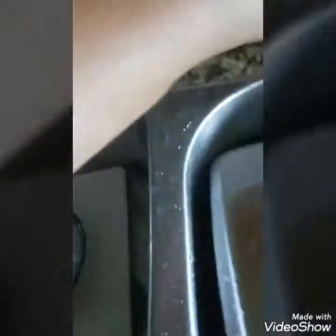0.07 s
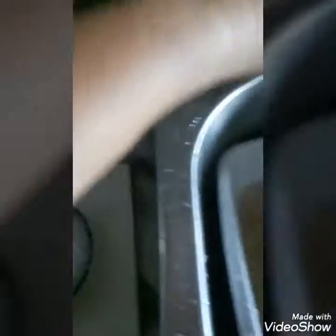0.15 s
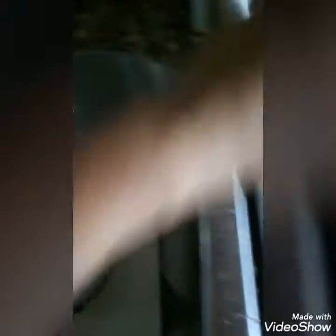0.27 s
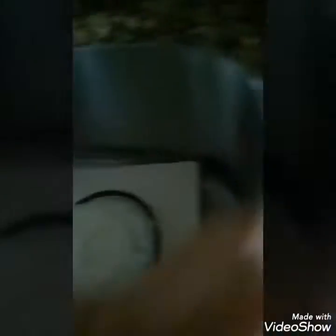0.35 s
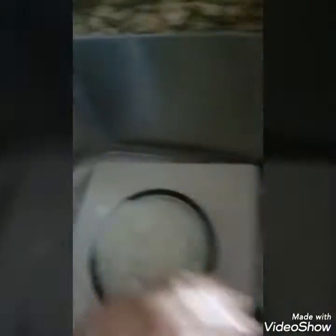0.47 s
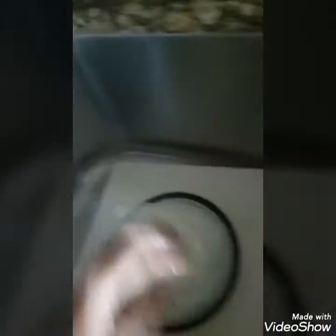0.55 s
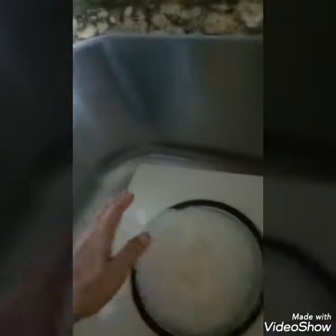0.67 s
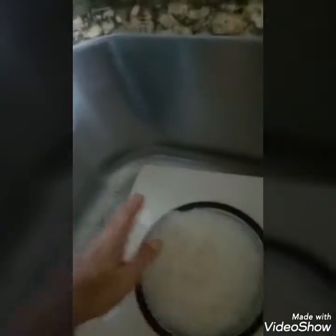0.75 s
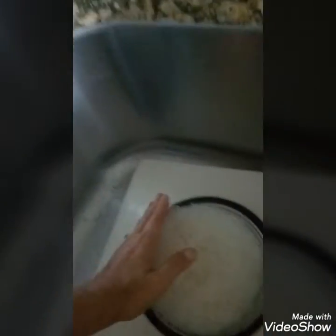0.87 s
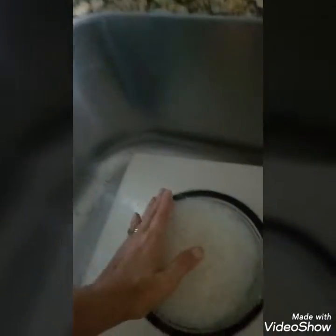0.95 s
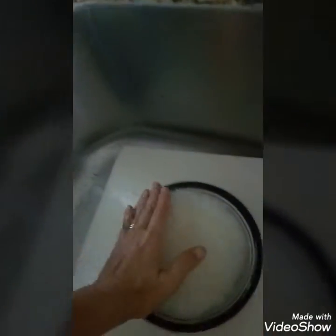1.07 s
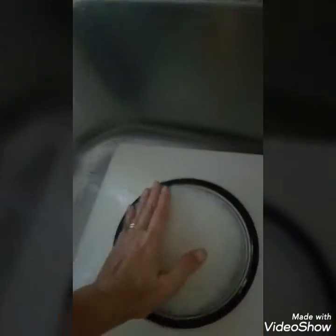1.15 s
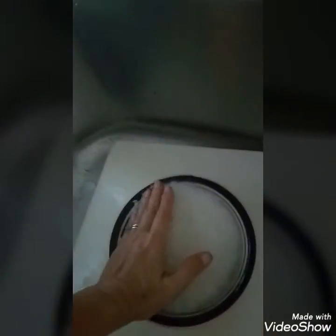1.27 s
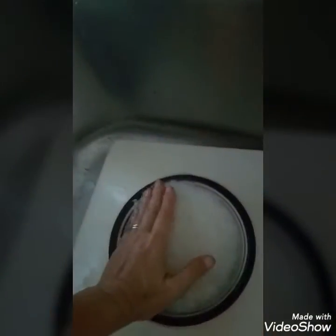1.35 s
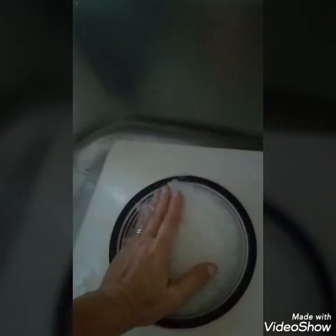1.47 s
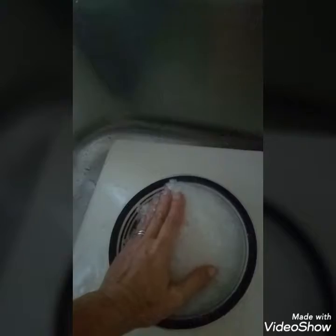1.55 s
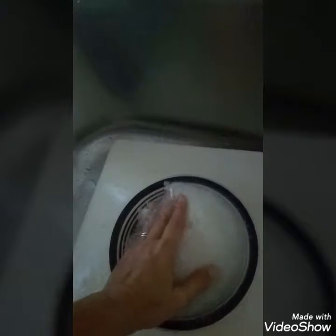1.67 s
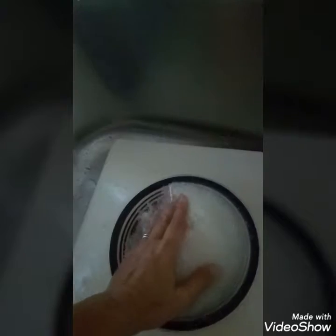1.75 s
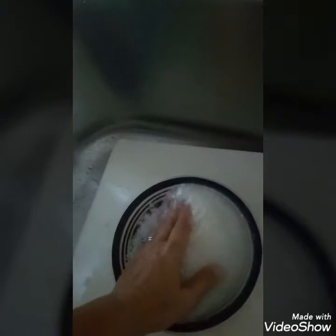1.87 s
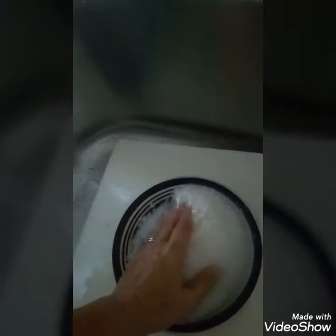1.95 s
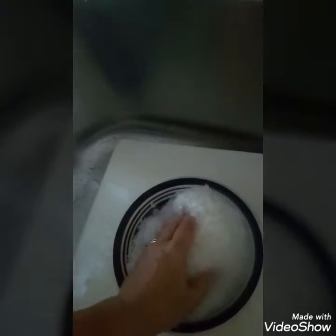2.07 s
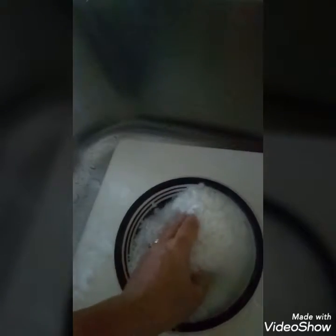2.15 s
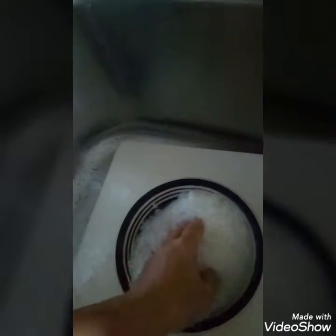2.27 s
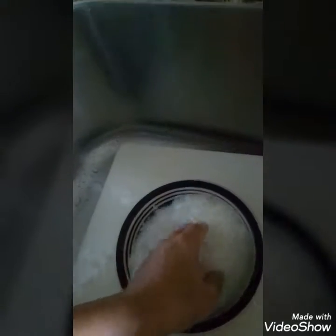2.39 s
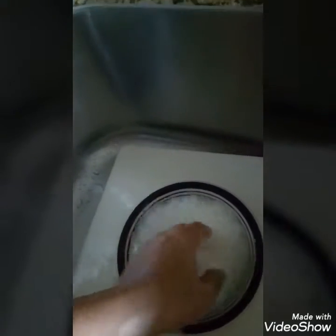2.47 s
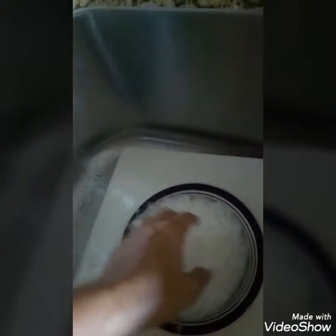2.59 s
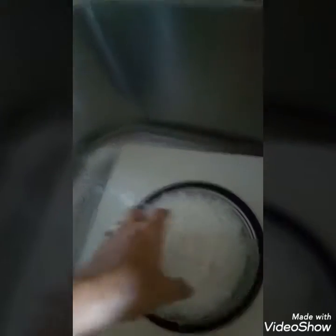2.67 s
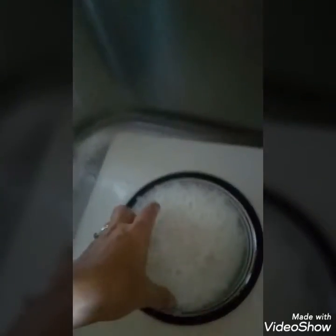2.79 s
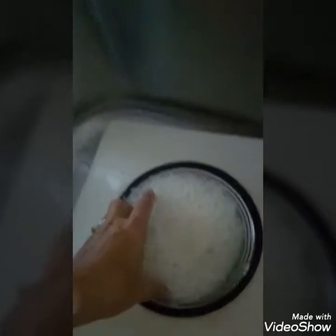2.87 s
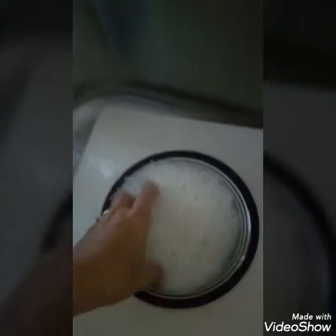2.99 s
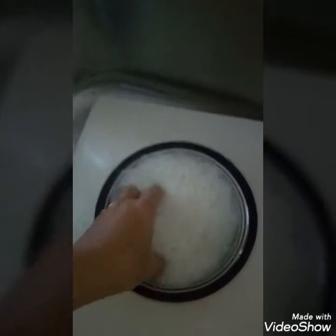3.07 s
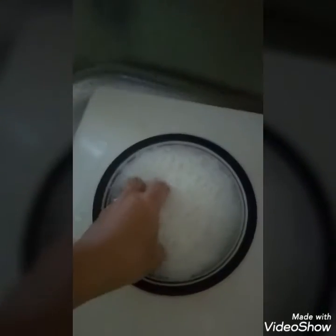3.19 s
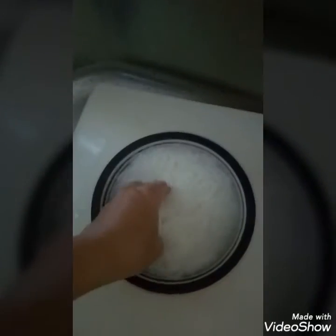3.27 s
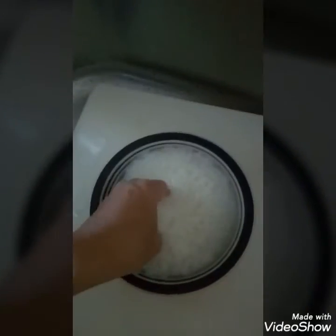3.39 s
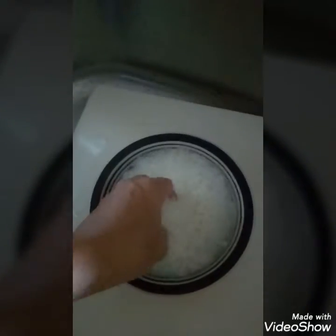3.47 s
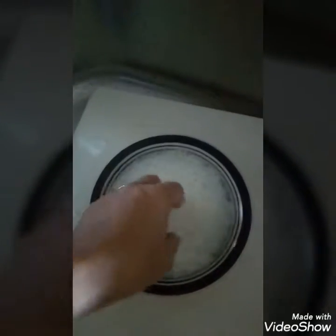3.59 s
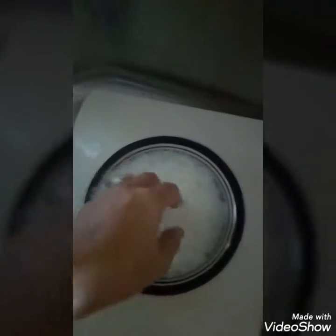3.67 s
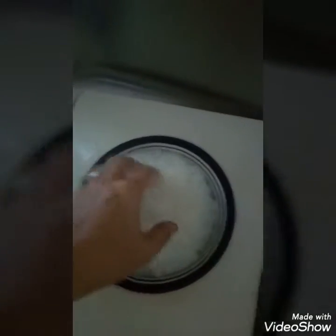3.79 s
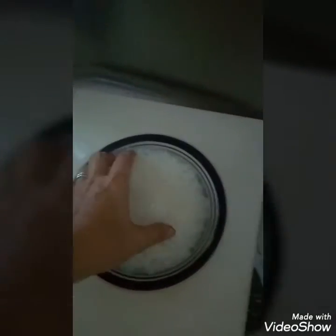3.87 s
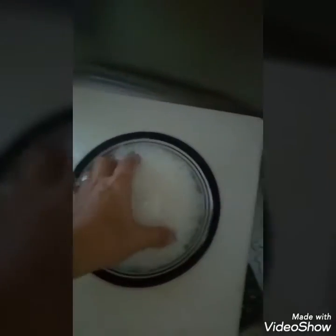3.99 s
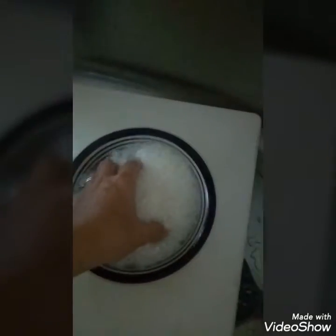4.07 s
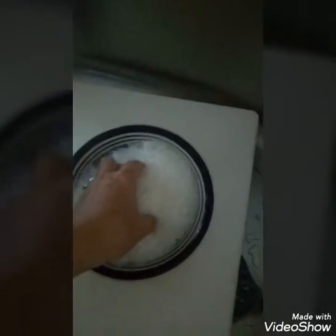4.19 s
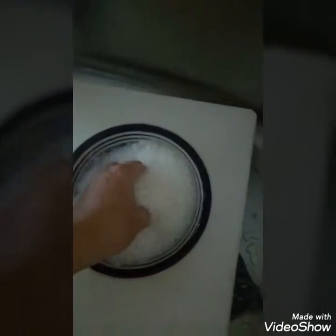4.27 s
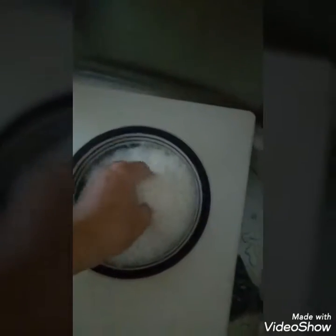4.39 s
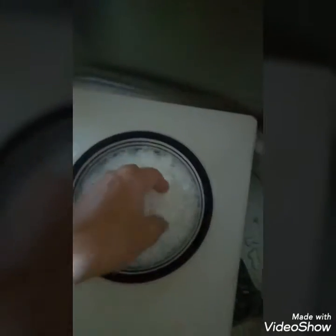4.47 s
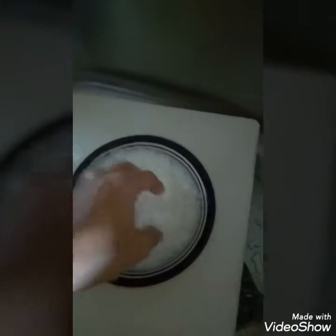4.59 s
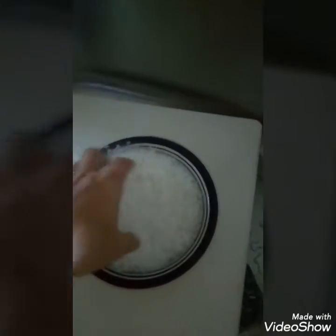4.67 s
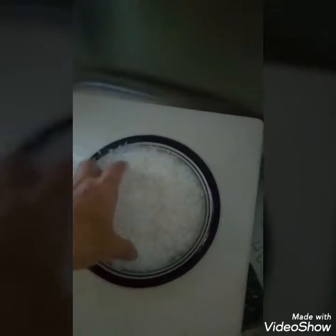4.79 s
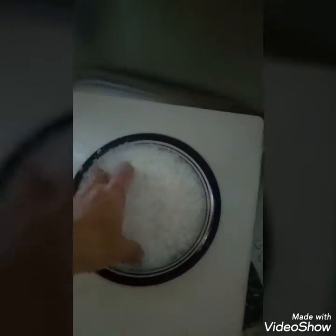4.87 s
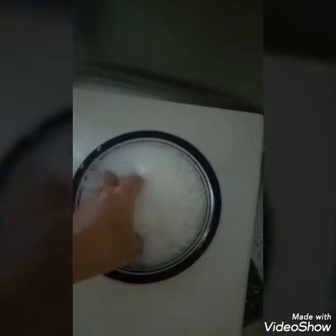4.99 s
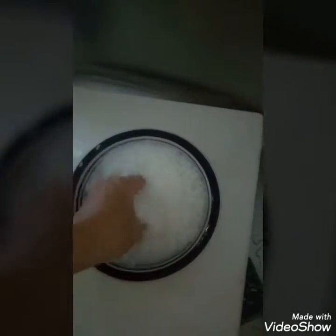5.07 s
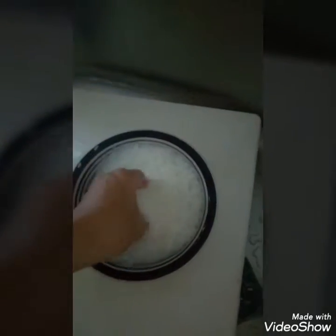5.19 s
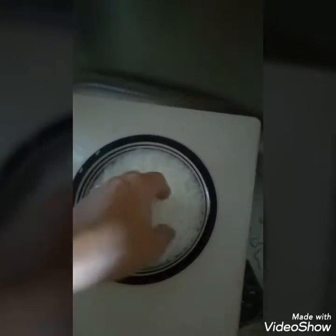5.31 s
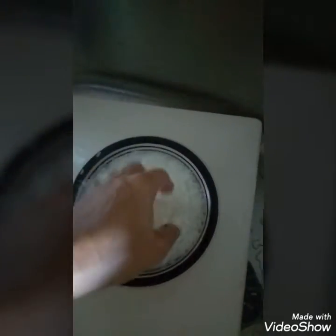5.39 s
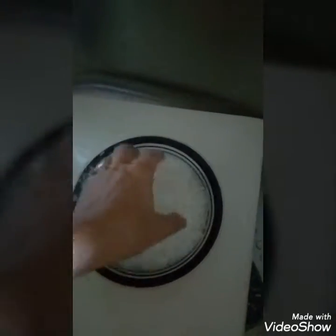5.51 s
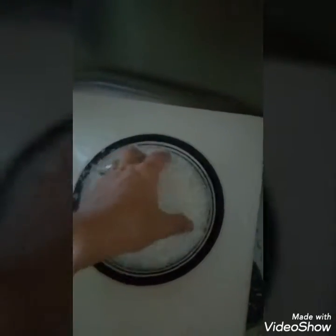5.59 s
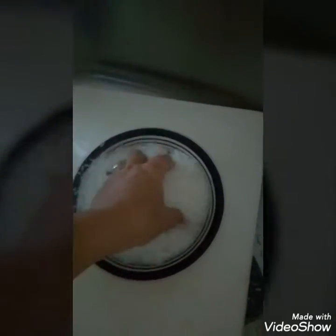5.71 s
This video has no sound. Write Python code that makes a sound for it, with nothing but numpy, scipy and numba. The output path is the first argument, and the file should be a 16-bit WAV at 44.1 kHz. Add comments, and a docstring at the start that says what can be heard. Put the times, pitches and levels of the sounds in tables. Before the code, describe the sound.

A full tap stream opens the sound, loud, bright and fizzy, sputtering into a bowl in a steel sink. At about 0.35 s it is shut off, falling sharply to a draining wash that is gone by 1.4 s. From 0.5 to 1.3 s, hollow low plops bubble in quick clusters, with tiny high ticks and spits of water. A low appliance hum is faintly present, dying down after 2 s. From 1.5 to 3 s, trickles, plops and grainy rustles of wet rice under a hand come in sweeps. Soft dull knocks on the steel fall near 2.3, 2.8, 3.3, 3.8 and 4.3 s. It thins around 3.1 to 3.7 s, then a flurry of gurgles returns from 3.8 to 4.6 s. A crisp drip clicks at 5 s; low rumble, faint drips and a small knock near 5.6 s end it. Close stereo, left-heavy, short kitchen reverberation.

```python
"""Rinsing rice at a steel sink

A kitchen tap is shut off; rinse water from a bowl of rice trickles, plops and ticks into a steel sink.
Bubbles are damped sines that excite the air modes of the basin; splashes and sprays are shaped noise.
Wet rice rustles under a hand in dense clicks, water spits in short bright noise bursts, the steel booms
and rings as band-passed noise and knocks, and an appliance hums in harmonics over the filtered noise
of the kitchen, all heard at two close ports.
"""
import sys
import numpy as np
from scipy import signal
from scipy.fft import rfft, irfft
from scipy.io import wavfile
from scipy.ndimage import uniform_filter1d
from numba import njit

SR = 44100
rng = np.random.default_rng(int(sys.argv[2]) if len(sys.argv) > 2 else 0)


def to_wav(sig):
    """Store sig (one row per channel, or 1-D mono) as 16-bit WAV at the path in sys.argv[1].

    Samples outside -1..1 are clipped; the rate is SR.
    """
    pcm = np.clip(np.atleast_2d(sig), -1, 1) * 32767
    pcm = np.round(pcm).astype(np.int16)
    wavfile.write(sys.argv[1], SR, pcm.T)  # frames by channels


N = 253134
T = np.arange(N) / SR  # s
HZ = np.maximum(np.fft.rfftfreq(N, 1 / SR), 1)

# Spectrum of the tap stream: frequency_hz [Hz], density_db [dB per Hz, relative]
JET_SPECTRUM = [(120, -64), (200, -6), (333, -10), (446, -4), (564, -18), (890, -14), (1150, -19),
                (1260, -9), (1400, -24), (1540, -10.5), (2000, -11.5), (2700, -9.5), (3200, -4.5),
                (3890, -1.5), (6830, -6), (7600, -16), (11000, -20), (15500, -39)]
# Drumming of the stream in the bowl, before the drain fade: time_s [s], level_db [dB]
DRUM_LEVEL = [(0, -59), (.18, -34.5), (.38, -41), (.44, -54), (.47, -38), (.6, -48.5), (.77, -52),
              (.82, -38), (.87, -42)]
JET_DB, WASH_DB = -24.5, -39  # full stream and draining wash, before the drain fade
SHUT_S, SHUT_LEN_S, DRAIN_END_S = 0.35, 0.08, 1.41


def jet():
    """Jet noise: dense bubbles over hiss, with bowl drumming; after shut-off the smoother wash drains."""
    fizz = [swarm(3000, 1300, 7200, 11.0, 3.8, .01) + .6 * rng.standard_normal(N) for _ in range(2)]
    spectra = [rfft(f) for f in fizz]
    # divide out the broad spectrum so that the table alone sets the colour
    flat = [f / np.sqrt(uniform_filter1d(np.abs(f) ** 2, size=2000)) for f in spectra]
    stream = ports(*(np.array(flat) * undb(over_hz(JET_SPECTRUM))))
    treble = irfft(rfft(stream) / (1 + (7000 / HZ) ** 8), N)
    calming = np.interp(T, [SHUT_S, SHUT_S + 3 * SHUT_LEN_S], [1, .4])
    sputter_db = (1.8 * walk(201.5) + 1.42 * walk(45)) * calming
    # the treble sputters half as deeply
    stream = unit((stream - treble) * undb(sputter_db) + treble * undb(sputter_db / 2))
    drum_db = over_time(DRUM_LEVEL, count=1) + 2.5 * walk(22.8)
    drum = hiss(resonance(473, 90)) * undb(drum_db)
    shut_times = [SHUT_S, SHUT_S + SHUT_LEN_S, SHUT_S + 3 * SHUT_LEN_S]
    flow_db = np.interp(T, shut_times, [JET_DB, WASH_DB + 11.0, WASH_DB])
    drain = np.clip((DRAIN_END_S - T) / 1.09, 0, 1)
    return (stream * undb(flow_db) + drum) * drain


@njit
def bubbles(length, start, hz, cycles, size, glide, rise):
    """Bubble oscillation: decaying sines swell over rise cycles; pitch climbs for two decay times."""
    out = np.zeros(length)
    for k in range(len(start)):
        span = cycles[k] * SR / hz[k]  # decay time in samples
        phase = 0.
        for i in range(min(int(5 * span), length - start[k])):
            phase += 2 * np.pi * hz[k] * (1 + glide * min(i / span, 2.)) / SR
            swell = min(phase / (2 * np.pi * rise), 1.) ** 2
            out[start[k] + i] += size[k] * swell * np.exp(-i / span) * np.sin(phase)
    return out


def swarm(per_s, low_hz, high_hz, cycles, scatter_db, glide):
    """Random superposition: bubbles at chance times, many small and few large, scaled to rms 1."""
    when, pitch, chance = rng.random((int(per_s * N / SR), 3)).T
    size = undb(np.minimum(-scatter_db * np.log(1 - chance), 4 * scatter_db))
    hz = low_hz * (high_hz / low_hz) ** pitch
    return unit(bubbles(N, (when * N).astype(np.int64), hz, cycles + 0 * hz, size, glide, 1.27))


LEAN_SPREAD_DB = 4.5  # largest random lean to either side


def bubble_broods(table, cycles, lean_db, glide, brood_db, spread_s, reach):
    """Bubble clusters: each listed bubble and four smaller ones near its pitch lean left or right."""
    s, db, hz = table[:, 0], table[:, 1], table[:, 2]
    when, pitch, weaker, side_draw = rng.random((len(s), 4, 5)).transpose(1, 0, 2)
    when[:, 0], pitch[:, 0] = 0, .5  # the first of each brood is the listed bubble
    lean = lean_db + LEAN_SPREAD_DB * (2 * side_draw[:, 0] - 1)
    start = ((s[:, None] + spread_s * when) * SR).astype(np.int64).ravel()
    brood_hz = (hz[:, None] * reach ** (2 * pitch - 1)).ravel()
    size_db = db[:, None] + (brood_db - 10.0 * weaker) * (np.arange(5) > 0)
    life = np.repeat(cycles + 0 * s, 5)
    sides = []
    for side in (1, -1):
        size = undb(size_db + side * lean[:, None] / 2).ravel()
        sides.append(bubbles(N, start, brood_hz, life, size, glide, 0.94))
    return np.array(sides)


# Large bubbles, before the basin: start_s [s], level_db [dB], pitch_hz [Hz], decay_cycles [cycles]
PLOP_EVENTS = [(.54, -28, 890, 4.5), (.572, -26, 865, 3.8), (.664, -8, 880, 2.2), (0.707, -13, 815, 1.4),
               (.727, -11.5, 840, 2.2), (.76, -13.5, 805, 2.3), (.793, -16, 927, 3), (.81, -5.5, 815, 1.8),
               (.88, -23.5, 1270, 3.4), (0.95, -16, 800, 1.56), (.999, -23.5, 564, 13),
               (1.003, -28.5, 1700, 14), (0.896, -25.5, 1466, 4.6), (1.043, -31, 1480, 3.2),
               (1.15, -12, 910, 0.94), (1.168, -16, 875, 2.3), (1.205, -12.5, 810, 2.4),
               (1.228, -10.5, 810, 1.16), (1.272, -20.5, 2280, 11.5), (1.459, -6, 1200, 0.5),
               (1.508, -18.5, 935, 1.8), (1.544, -19, 940, 4.6), (1.572, -32, 1180, 2.7),
               (1.623, -20, 1350, 3.9), (1.65, -31.5, 1500, 7.9), (1.675, -28.5, 1320, 4.8),
               (1.724, -32, 1530, 13), (1.752, -30, 1430, 8.6), (1.772, -16, 1438, 7.1),
               (1.871, -14, 1070, 1.8), (1.898, -11.5, 940, 1.2), (1.916, -10.5, 893, 2.8),
               (1.962, -24.5, 1385, 12.3), (2.048, -35.5, 1440, 14), (2.109, -24.5, 1554, 7.5),
               (2.168, -18.5, 930, 1.5), (2.196, -17.5, 1340, 1.5), (2.206, -12.5, 2080, 3.3),
               (2.218, -15.5, 564, 1.3), (2.281, -27, 1550, 4.5), (2.422, -27, 1730, 10.4),
               (2.491, -20.5, 1860, 8.4), (2.551, -34.5, 1510, 7.6), (2.651, -12, 1340, 0.62),
               (2.801, -24, 1927, 22), (2.895, -12, 850, 0.71), (2.941, -30.5, 1590, 7.8),
               (2.977, -7.5, 1680, 0.94), (3.042, -25, 1210, 1.5), (3.184, -48, 1075, 45),
               (3.216, -49, 1092, 26), (3.272, -30.5, 844, 2), (3.431, -42.5, 1474, 16),
               (3.481, -37.5, 1477, 6.3), (3.601, -36.5, 1340, 3.1), (3.775, -15, 940, 1.6),
               (3.798, -14.5, 1160, 2.3), (3.864, -20, 1180, 1.25), (4.003, -19.5, 1378, 7.9),
               (4.029, -27.5, 1350, 4.8), (4.06, -25, 1940, 10), (4.077, -19, 890, 2.2),
               (4.141, -19.5, 835, 1.2), (4.275, -31, 860, 2.2), (4.353, -25.5, 1495, 3.3),
               (4.408, -20.5, 920, 7.5), (4.409, -20.5, 1254, 4.1), (4.38, -37, 1400, 3),
               (4.434, -16, 910, 2.7), (4.435, -17.5, 1280, 1.4), (4.479, -16.5, 1387, 8.4),
               (4.53, -4, 1240, 0.62), (4.62, -32.5, 1210, 4), (4.79, -56, 1270, 2.5),
               (4.82, -53, 1260, 4.9), (5.36, -66, 1334, 9.9), (5.385, -58, 1350, 12),
               (5.402, -52.5, 1352, 12), (5.707, -51.5, 1360, 2.1)]
PLOP_LEAN_DB = 0.5  # left minus right, beyond the usual balance


def plops(table):
    """Large-bubble resonance: low tones of steady pitch, most quickly damped and some ringing long."""
    return bubble_broods(table, table[:, 3], PLOP_LEAN_DB, 0., -8.0, 0.009, 1.4)


SPLASH_DB, SPLASH_PER_PLOP = -35.5, 0.82  # drive for a -25 dB plop; dB per dB of plop


def splash(table):
    """Turbulent noise: a broad wet burst with each plop, stronger for a stronger plop."""
    band = resonance(1100, 1800) * resonance(970, 5800) ** 2
    wet = unit(irfft(rfft(rng.standard_normal(N)) * band, N))
    return bursts(table[:, 0], SPLASH_DB + SPLASH_PER_PLOP * (table[:, 1] + 25), 0.0032, 0.0021) * wet


# Small bubbles, before the basin:
# start_s [s], level_db [dB], pitch_hz [Hz], spray_db [dB relative to level_db]
TICK_EVENTS = [(.026, -12.5, 4070, -29), (.048, -19, 5630, -9), (.088, -24.5, 3830, -30.5),
               (.128, -16.5, 3920, -6.5), (.225, -16.5, 5200, -31), (.283, -10.5, 3540, -14),
               (.375, -12.5, 3380, -29.5), (.388, -9, 4000, -31), (0.4864, -25, 4990, 3),
               (0.5437, -22.5, 3920, -9), (0.616, -28.5, 2770, -35), (0.647, -28, 3510, -33),
               (0.665, -28.5, 2680, -40), (0.711, -37, 2750, -40), (.746, -27, 2740, -40),
               (0.7902, -21, 2690, -36), (0.808, -37, 2730, -40), (0.838, -38, 2700, -40),
               (0.878, -43, 2780, -40), (0.897, -35, 2710, -40), (.952, -31, 2740, -38),
               (1, -46, 2730, -40), (0.958, -23.5, 4580, -40), (1.022, -27.5, 3980, -42.5),
               (1.1497, -27.5, 3030, -42), (1.237, -36, 4260, -2), (1.21, -37, 2770, -38),
               (1.3, -36, 2730, -40), (1.353, -39, 4570, -40.5), (1.39, -38, 2800, -40),
               (1.409, -31, 4100, -21), (1.538, -26.5, 6740, -10), (1.559, -34, 3700, -27),
               (1.653, -34, 3780, -13), (1.744, -22, 3310, -18.5), (1.8652, -28.5, 3653, -22),
               (1.956, -31.5, 2710, -9.5), (1.989, -30, 4180, -35), (2.0728, -28.5, 4060, -13),
               (2.148, -31, 2740, -21), (2.173, -19.5, 3280, -37), (2.2065, -15.5, 3040, -22),
               (2.258, -17.5, 4750, -15), (2.02, -38, 2730, -40), (2.066, -33, 2970, -30),
               (2.287, -30, 5300, -25), (2.333, -34, 3970, -41), (2.446, -37, 2710, -38),
               (2.469, -32, 4740, -30), (2.51, -30.5, 3240, -15), (2.563, -33, 2840, -40),
               (2.62, -22.5, 2624, -39), (2.699, -29.5, 2250, -45), (2.775, -33.5, 2930, -21),
               (2.879, -34.5, 4030, -30), (2.978, -29, 4190, -11), (3.021, -32, 4410, -5.5),
               (3.172, -34.5, 3830, -35), (3.2093, -33.5, 2630, -10), (3.329, -35, 2690, -40),
               (3.37, -25, 4020, -55), (3.4182, -28.5, 2590, -12), (3.449, -44, 2700, -40),
               (3.4733, -38, 3710, -20), (3.5694, -32, 3780, -65), (3.605, -36, 3050, -34),
               (3.668, -33, 3960, -36), (3.7367, -27.5, 2940, -44), (3.776, -30, 2810, -43),
               (3.8005, -27, 2920, -56), (3.937, -36, 3830, -13), (3.97, -27, 3710, -27),
               (4.006, -30.5, 2730, -14), (4.074, -33.5, 4110, -27), (4.1428, -31.5, 3740, -17),
               (4.2514, -31, 3460, -31), (4.3357, -34, 4470, -10), (4.3504, -31, 3620, -41),
               (4.434, -39, 3470, -30), (4.48, -28.5, 4100, -12), (4.498, -43, 2730, -44),
               (4.535, -35, 2670, -42), (4.568, -35.5, 2830, -44), (4.61, -43, 2780, -35),
               (4.642, -36, 3290, -40), (4.689, -45, 2790, -42.5), (4.73, -48, 2750, -33),
               (4.956, -30.5, 5730, -12.5), (4.992, -24.5, 2780, -6.5), (4.9994, -16, 4490, -34),
               (5.31, -41.5, 5870, -27), (5.405, -47.5, 3600, -40), (5.525, -55, 2640, -33)]
TICK_LEAN_DB = -3  # left minus right, beyond the usual balance


def ticks(table):
    """Small-bubble resonance: high tones that climb slightly in pitch as they decay."""
    return bubble_broods(table, 13.1, TICK_LEAN_DB, 0.041, -6.0, 0.0086, 1.2)


def crack(table):
    """Impulsive noise: a rough broad snap of water with each tick."""
    wet = unit(irfft(rfft(rng.standard_normal(N)) * resonance(3560, 2600) ** 2, N))
    return bursts(table[:, 0], table[:, 1] - 8.0, 0.0055, 0.0029) * wet


def spray(table):
    """Droplet noise: a high-band burst of fine droplets with each tick, heard outside the basin modes."""
    fine = hiss(resonance(5450, 3900) ** 3 / (1 + (HZ / 10000) ** 6)) * undb(2.0 * walk(150))
    return bursts(table[:, 0], table[:, 1] + table[:, 3], 0.0047, 0.0045) * fine


# Water leaving the bowl and hand stirring the rice, before the basin:
# time_s [s], flow_gurgle_db [dB], stirring_fizz_db [dB]
TRICKLE_LEVEL = [(.4, -27, -46), (.5, -44.5, -35), (.95, -50, -45), (1.57, -37.5, -47.5),
                 (1.78, -44.5, -49), (1.96, -51.5, -76), (2.14, -48.5, -40.5), (2.21, -41, -44),
                 (2.3, -48.5, -46), (2.55, -55, -51), (2.81, -59, -53), (3.02, -52, -59.5), (3.3, -73, -49),
                 (3.6, -61, -67), (3.85, -63.5, -52), (4.05, -43.5, -50.5), (4.3, -62, -57),
                 (4.4, -48, -68), (4.5, -35.5, -44.5), (4.65, -58.5, -64.5), (5.2, -84.5, -64),
                 (5.74, -71, -80.5)]


def trickle():
    """Flow noise: bubble swarms over a running film, a low gurgle and a high fizz in flurries."""
    film = rfft(rng.standard_normal(N))
    low_film = unit(irfft(film * resonance(1700, 1600) ** 2, N))
    high_film = unit(irfft(film * resonance(4130, 4000) ** 2, N))
    gurgle = swarm(800, 500, 2600, 4.5, 3.9, 0.) + 0.15 * low_film
    fizz = swarm(1400, 1900, 5200, 9.0, 4.2, 0.) + 0.25 * high_film
    flow_db, stir_db = over_time(TRICKLE_LEVEL, count=1), over_time(TRICKLE_LEVEL, count=2)
    low = gurgle * undb(flow_db + 0.53 * walk(5.8))
    high = fizz * undb(stir_db + 2.0 * walk(45))
    # drops off the rim share nearly one pitch
    rim = swarm(71, 2613, 2830, 42.0, 7.7, 0.) * undb(-18.5 + (flow_db + stir_db) / 2)
    return (low + high + rim) * np.clip((T - .3) / 0.5, 0, 1)


# Air modes of the basin: frequency_hz [Hz], width_hz [Hz], gain_db [dB]
BASIN_MODES = [(466, 29, 0), (858, 45, -4.5), (1299, 75, 2), (1492, 83, -2), (2696, 58, 2.5), (3646, 72, 1),
               (3878, 88, 5.5), (4420, 380, -0.5), (6220, 320, 5)]
DIRECT_DB, WET_TOP_HZ = -14.5, 7500  # direct path; the basin dulls the water above this
KITCHEN_DB, KITCHEN_T60_S = -10, 0.27


def basin(source):
    """Cavity resonance: direct sound, air modes and a tail; modes differ in phase between the ports."""
    paths = []
    for port in range(2):
        modes = 0
        for k, (hz, width_hz, db) in enumerate(BASIN_MODES):
            # the phase turn at the second port grows with frequency, up to a limit
            turn = np.exp(1j * port * (-1) ** k * min(hz / 900, 2.2))
            modes = modes + undb(db) * resonance(hz, width_hz) * turn
        paths.append((undb(DIRECT_DB) + modes) * (1 + undb(KITCHEN_DB) * kitchen_tail()))
    lead = undb(over_hz(LEFT_LEAD_DB) / 2)
    dulling = 1 + (HZ / WET_TOP_HZ) ** 4
    return irfft(np.array([paths[0] * lead, paths[1] / lead]) * rfft(source) / dulling, N)


def kitchen_tail():
    """Reverberation: spectrum of exponentially decaying noise of unit energy after a 12 ms gap."""
    tail = rng.standard_normal(N) * np.exp(-np.log(1000) * T / KITCHEN_T60_S) * (T > .012)
    return rfft(tail / np.sqrt(np.sum(tail ** 2)))


# Rustle of rice, swelling with each sweep of the hand: time_s [s], level_db [dB]
RUSTLE_LEVEL = [(.5, -79), (1.5, -52), (1.9, -57), (2.05, -56), (2.2, -50.5), (2.3, -55.5), (2.5, -58.5),
                (2.85, -68.5), (3.0, -51.5), (3.15, -59.5), (3.4, -65.5), (3.65, -68.5), (3.8, -78),
                (4.05, -52), (4.2, -68.5), (4.33, -62), (4.4, -70), (4.5, -70), (4.65, -106), (5.0, -66.5),
                (5.74, -78.5)]


def rice():
    """Granular friction: wet grains rub under the hand, dense tiny clicks blending into rustles."""
    band = resonance(3870, 5440) ** 2
    a, b = (rfft(swarm(3000, 3000, 12000, 8.2, 3.7, 0.)) * band for _ in range(2))
    return unit(ports(a, b)) * undb(over_time(RUSTLE_LEVEL, count=1) + 2.5 * walk(30)) * (T > .45)


# Short bright spurts and spits of water, before envelope and left-right gain:
# start_s [s], level_db [dB], centre_hz [Hz]
SPURT_EVENTS = [(0.4084, -28, 7900), (0.4276, -26, 7650), (0.497, -29.5, 8160), (.6115, -45, 6300),
                (0.694, -44, 6750), (.8399, -47.5, 6000), (1.2071, -59, 6670), (1.3283, -45, 6500),
                (1.539, -38, 9600), (1.709, -48, 6500), (1.9459, -68, 7400), (2.0573, -49, 10700),
                (2.0994, -37.5, 5950), (2.1649, -51.5, 10800), (2.26, -39, 6500), (2.379, -47, 7000),
                (2.4206, -45.5, 5970), (2.489, -42, 5440), (2.878, -41.5, 6800), (2.954, -44, 6500),
                (3.0799, -56, 7340), (3.3044, -47.5, 6050), (3.417, -58, 6240), (3.5443, -53, 7100),
                (3.753, -49.5, 6450), (3.865, -51.5, 6100), (3.9707, -45.5, 7350), (4.0172, -38.5, 6400),
                (4.0616, -45, 10600), (4.11, -44, 6400), (4.338, -50, 6800), (4.4807, -56, 10300),
                (4.686, -60, 6440), (4.9986, -42, 9400), (4.999, -50, 13100), (5.3682, -56, 6860),
                (5.723, -67, 8000)]
SPURT_WIDTH, SPURT_RISE_S, SPURT_FADE_S = 0.28, 0.0017, 0.0052  # width as a share of the centre


def spurts():
    """Band-limited noise: short bright spurts and spits of water, each in its own high band."""
    out, t = np.zeros((2, N)), np.arange(2048) / SR
    shape = (1 - np.exp(-t / SPURT_RISE_S)) * np.exp(-t / SPURT_FADE_S)
    hz = np.maximum(np.fft.rfftfreq(len(t), 1 / SR), 1)
    for s, db, centre in SPURT_EVENTS:
        band = 1 / (1 + ((hz ** 2 - centre ** 2) / (hz * centre * SPURT_WIDTH)) ** 4)
        spit = unit(irfft(rfft(rng.standard_normal((2, len(t)))) * band)) * shape * undb(db)
        start = int(s * SR)
        out[:, start:start + len(t)] += spit[:, :N - start]
    return out * undb(np.array([[6.0], [-4.5]]))


# Boom of the steel floor: time_s [s], level_db [dB]
BOOM_LEVEL = [(1.6, -45), (2.4, -45.5), (3.13, -44.5), (3.55, -48), (3.61, -57), (3.8, -44.5),
              (4.63, -44.5), (5.3, -48.5), (5.44, -60.5), (5.54, -45), (5.67, -49)]
BOOM_HZ, BOOM_WIDTH_HZ = 134, 35
PATTER_DB, PATTER_PER_FLOW = -54.5, 0.37  # level at a flow of -43.5 dB; dB per dB of flow


def steel():
    """Plate vibration: the sink floor booms in one wide mode and patters under the trickle."""
    boom_db = over_time(BOOM_LEVEL, count=1) + 0.28 * walk(24)
    boom = hiss(resonance(BOOM_HZ, BOOM_WIDTH_HZ) ** 2) * undb(boom_db)
    flow_db = over_time(TRICKLE_LEVEL, count=1)
    patter_db = PATTER_DB + PATTER_PER_FLOW * (flow_db + 43.5) + 5.03 * walk(25.42)
    patter = hiss(resonance(344, 218) ** 2 + 0.58 * resonance(433, 60)) * undb(patter_db)
    return boom + patter * (T > .4)


# Modes of the steel, one floor, one rim, three middle, then top:
# frequency_hz [Hz], width_hz [Hz], gain_db [dB]
STEEL_MODES = [(177.6, 12.6, 9), (832, 48, 3), (2010, 55, -3), (2092, 50, 2), (2280, 100, -6),
               (2770, 60, 2), (2960, 80, -1), (3740, 100, -12)]
# Dull knocks on the steel floor, before drive and modes:
# start_s [s], level_db [dB], rim_db, middle_db, top_db [dB relative to level_db]
KNOCK_EVENTS = [(2.326, -28.5, -13.5, -9.5, -11.5), (2.801, -32, -26.5, -14, -13),
                (3.268, -42, -3, -4, -20), (3.773, -32.5, -10, -7.5, -7.5), (4.271, -39.5, -8.5, -20, -8.5),
                (4.887, -39.5, -6, -13, -32), (5.605, -43.5, -9.5, 14, 8.5), (5.704, -63, -12, 11, 4.5)]
PUSH_DB, RIM_DB, CONTACT_DB = 29, 56.5, 43.5  # drive of floor, rim and higher modes
SCRAPE_DB, SCRAPE_RISE_S, SCRAPE_FADE_S = -27, 0.002, 0.012  # rough contact around the click


def knocks():
    """Modal excitation: a soft push moves the floor; rim and high modes swell in through the water."""
    s, db, rim_db, middle_db, top_db = np.transpose(KNOCK_EVENTS)
    ring = [undb(gain_db) * resonance(hz, width_hz) for hz, width_hz, gain_db in STEEL_MODES]
    floor = rfft(bursts(s, db + PUSH_DB, 0.00085, 0.0002)) * ring[0]
    drives = []
    for extra in (rim_db + RIM_DB, middle_db + CONTACT_DB, top_db + CONTACT_DB):
        click = bursts(s + 0.000963, db + extra - 6.0, .00004, .00004)
        scrape = bursts(s + 0.00056, db + extra + SCRAPE_DB, SCRAPE_RISE_S, SCRAPE_FADE_S)
        drives.append(rfft(click + scrape * rng.standard_normal(N)))
    rim = drives[0] * ring[1] * resonance(838, 200) ** 2
    # extra resonance slows the onset of the higher modes
    steep = [r * resonance(hz, 290) ** 2 for r, (hz, _, _) in zip(ring, STEEL_MODES)]
    knock = floor + rim + drives[1] * sum(steep[2:5]) + drives[2] * sum(steep[5:])
    tails = np.array([kitchen_tail(), kitchen_tail()])
    knock = knock * (1 + undb(KITCHEN_DB) * tails)
    return irfft(knock * undb(np.array([[2.5], [-4.0]])), N)


# Harmonics of the motor, relative to the hum level: frequency_hz [Hz], level_db [dB]
HUM_HARMONICS = [(60, -23.5), (120, -2.5), (180, -11.5), (240, -13.5)]
# Hum before the left-right offset: time_s [s], level_db [dB]
HUM_CURVE = [(0, -52), (.4, -41.5), (.6, -39.5), (1.2, -44), (1.8, -39.5), (2.15, -59.5), (2.4, -66.5)]


def hum():
    """Harmonic series: mains tones of an appliance motor waver in level, then die down."""
    tones = sum(undb(db + 1.5 * walk(6)) * np.sin(2 * np.pi * hz * T) for hz, db in HUM_HARMONICS)
    return np.sqrt(2) * tones * undb(over_time(HUM_CURVE, count=1) + np.array([[1.5], [-1.5]]))


# Kitchen background spectrum: frequency_hz [Hz], density_db [dB per Hz, relative]
ROOM_SPECTRUM = [(12, -55), (20, 1.5), (64, 1), (132, 12), (249, -3), (387, -30), (1020, -86),
                 (3090, -27.5), (4560, -11.5), (6360, -77.5), (7930, -62), (11600, -71), (11900, -30),
                 (12200, -68.5), (15000, -74.5)]
# Swell of its rumble and hiss over ROOM_DB: time_s [s], gain_db [dB]
ROOM_CURVE = [(0, 10), (.6, 9.5), (1.5, 15.5), (2.5, 6), (3.5, 5.5), (4.6, 6), (5.2, 7), (5.45, 4),
              (5.6, 2)]
ROOM_DB = -76  # of the part above 250 Hz, before the swell


def kitchen():
    """Ambient noise: filtered rumble and hiss that slowly swell and flutter slightly."""
    colour = undb(over_hz(ROOM_SPECTRUM))
    above = np.sqrt(np.mean(colour ** 2) / np.mean((colour * (HZ > 250)) ** 2))
    return hiss(colour) * above * undb(ROOM_DB + over_time(ROOM_CURVE, count=1) + 0.39 * walk(19.0))


# Balance of the two ports: frequency_hz [Hz], left_minus_right_db [dB]
LEFT_LEAD_DB = [(60, 3), (110, 3), (200, 5), (400, 7.5), (2000, 8), (4400, 10), (9500, 11.5), (12500, 2),
                (15000, 2)]
# Likeness of the two ports: frequency_hz [Hz], coherence [0 to 1]
PORT_LIKENESS = [(40, .8), (130, 0.99), (290, 0.59), (640, .8), (1400, 0.23), (3000, .5), (8000, .2)]
TURN_HZ = 1500  # from here up the right port hears the shared part a quarter cycle late


def ports(a, b):
    """Partial coherence: two ports share a part of the sound; the left is louder, their mean keeps level."""
    alike = np.clip(over_hz(PORT_LIKENESS), 0, 1)
    right = undb(-over_hz(LEFT_LEAD_DB))
    late = np.exp(-.5j * np.pi * np.minimum(HZ / TURN_HZ, 1))
    left = 2 / np.sqrt(1 + right ** 2 + 2 * alike * right * late.real)
    right_sound = alike * late * a + np.sqrt(1 - alike ** 2) * b
    return irfft(np.array([left * a, left * right * right_sound]), N)


def hiss(gain):
    """Filtered noise: two-port noise with the given response, rms near 1."""
    a, b = rfft(rng.standard_normal((2, N))) * gain
    return ports(a, b) / np.sqrt(np.mean(np.abs(gain) ** 2))


def resonance(hz, width_hz):
    """Simple resonator: band-pass response with gain 1 at the centre."""
    return 1 / (1 + 1j * (HZ ** 2 - hz ** 2) / (HZ * width_hz))


def bursts(s, db, rise_s, fade_s):
    """Exponential relaxation: an envelope that rises quickly at each time and fades."""
    kick = np.zeros(N)
    kick[(s * SR).astype(int)] = undb(db)
    quick, slow = np.exp(-1 / (rise_s * SR)), np.exp(-1 / (fade_s * SR))
    fading = signal.lfilter([1], [1, -slow], kick)
    return signal.lfilter([1 - quick], [1, -quick], fading)


def walk(rate):
    """Random modulation: levels held 1 / rate s and smoothed twice, scaled to rms 1."""
    k = int(SR / rate)
    steps = np.repeat(rng.standard_normal(N // k + 1), k)
    return unit(uniform_filter1d(uniform_filter1d(steps, k), k)[:N])


def undb(db):
    """Logarithmic level: decibels to amplitude gain."""
    return 10 ** (np.asarray(db, float) / 20)


def unit(x):
    """Normalization: scale to rms 1."""
    return x / np.sqrt(np.mean(x ** 2))


def over_hz(table):
    """Logarithmic interpolation: a (frequency, value) table on every frequency bin."""
    hz, value = np.transpose(table)
    return np.interp(np.log(HZ), np.log(hz), value)


def over_time(table, count):
    """Linear interpolation: column count of a curve on every sample."""
    return np.interp(T, np.array(table)[:, 0], np.array(table)[:, count])


def scene():
    """Superposition: bubbles, splashes and trickle pass through the basin; the rest adds beside it."""
    plop_table, tick_table = np.array(PLOP_EVENTS), np.array(TICK_EVENTS)
    water = plops(plop_table) + ticks(tick_table)
    water = water + splash(plop_table) + crack(tick_table) + trickle()
    beside = jet() + spray(tick_table) + rice() + spurts() + steel() + knocks()
    return basin(water) + beside + hum() + kitchen()


TOP_HZ = 15700


def record(dry):
    """Band limiting: a steep elliptic low-pass cuts the top."""
    return signal.sosfilt(signal.ellip(10, .2, 80, TOP_HZ, fs=SR, output="sos"), dry)


dry = scene()
out = record(dry)
to_wav(out)
```